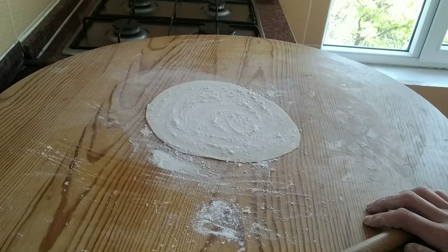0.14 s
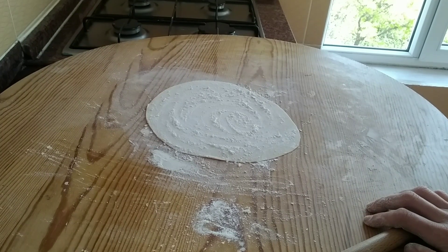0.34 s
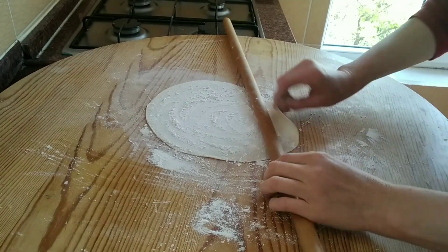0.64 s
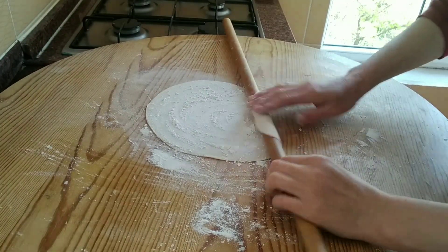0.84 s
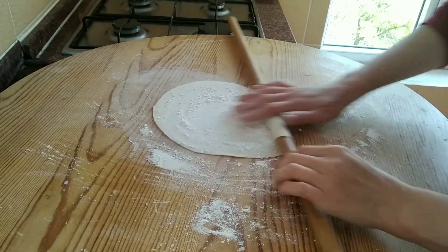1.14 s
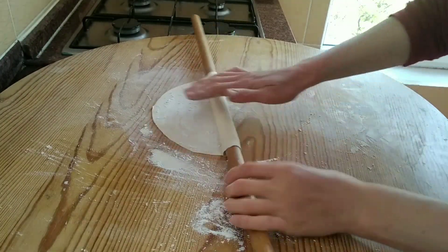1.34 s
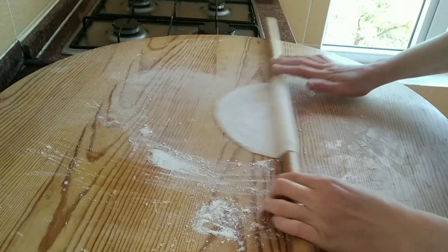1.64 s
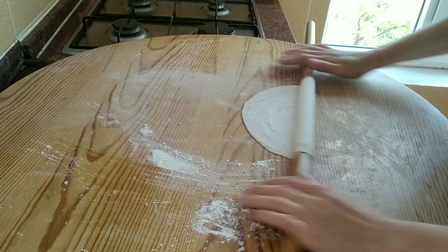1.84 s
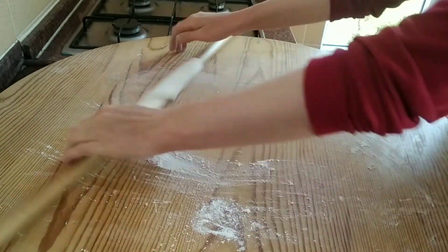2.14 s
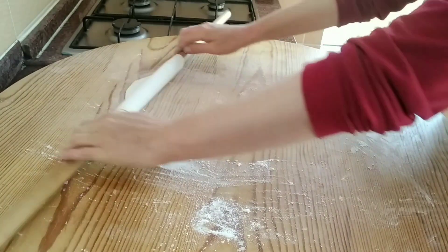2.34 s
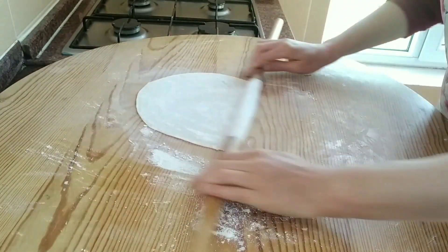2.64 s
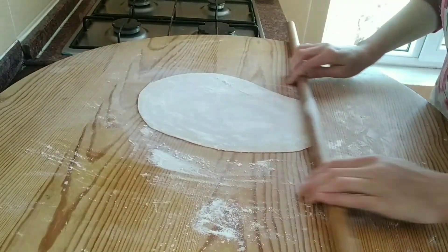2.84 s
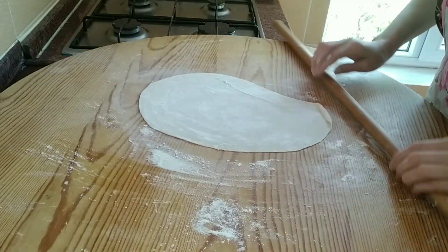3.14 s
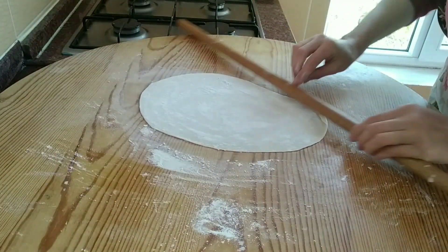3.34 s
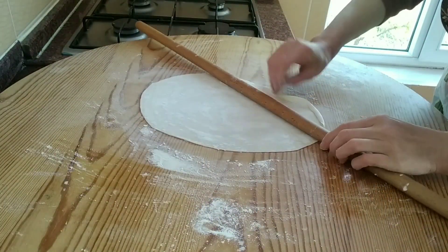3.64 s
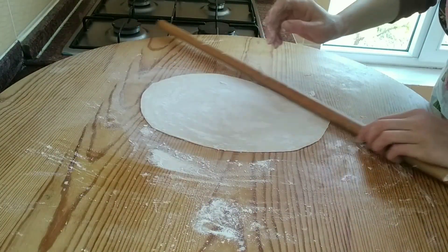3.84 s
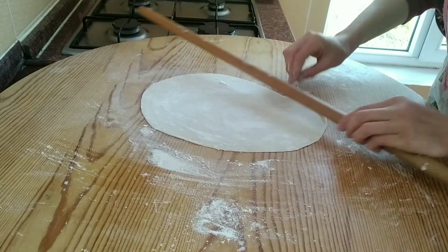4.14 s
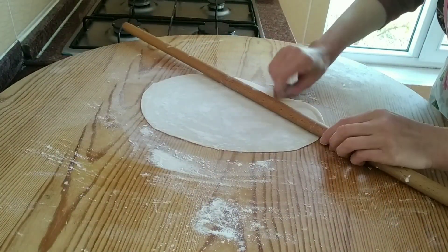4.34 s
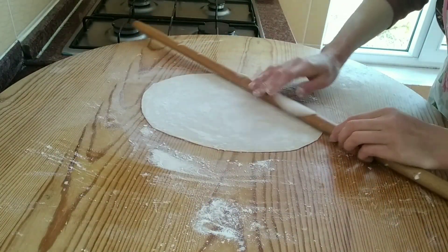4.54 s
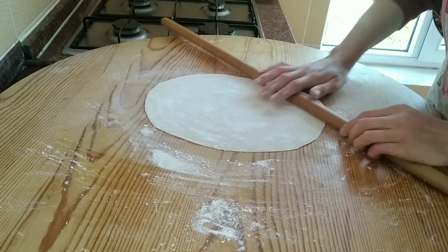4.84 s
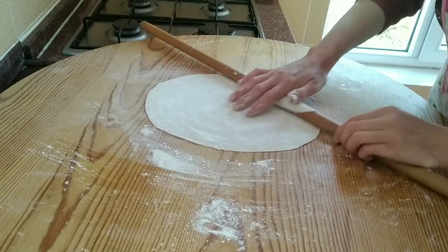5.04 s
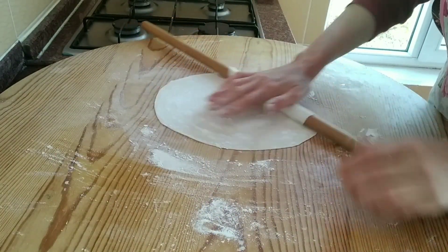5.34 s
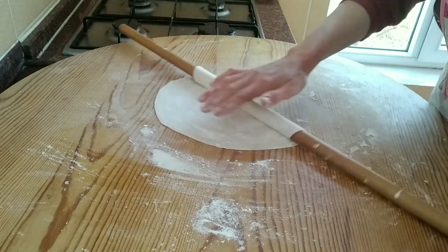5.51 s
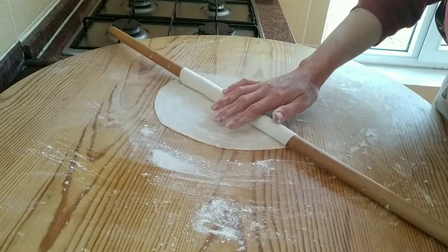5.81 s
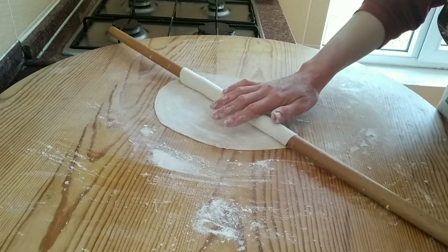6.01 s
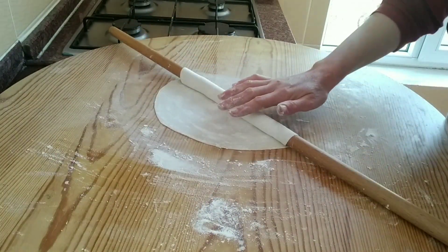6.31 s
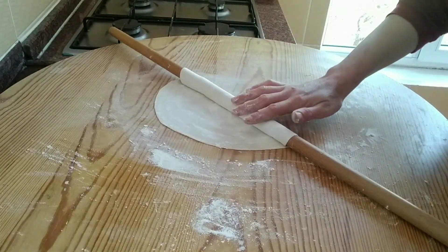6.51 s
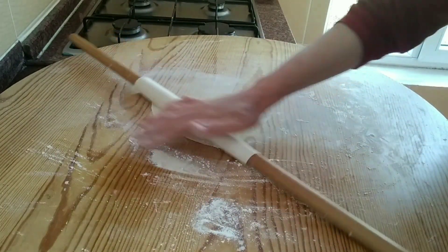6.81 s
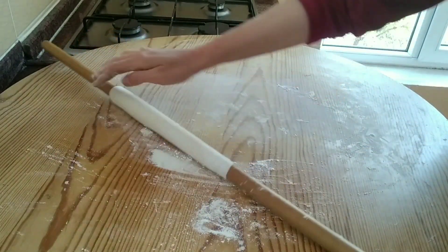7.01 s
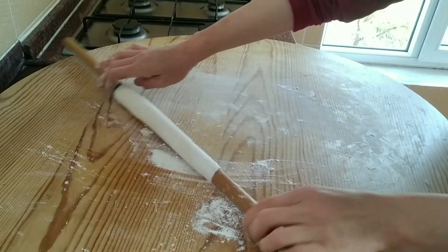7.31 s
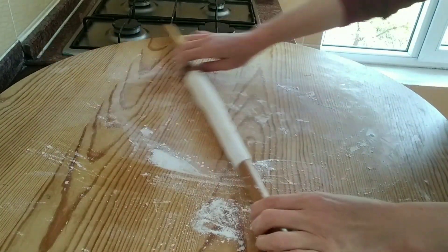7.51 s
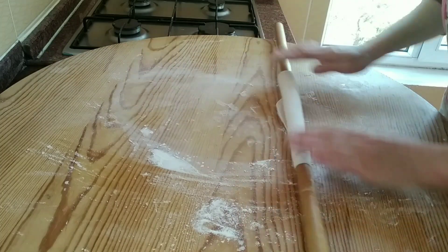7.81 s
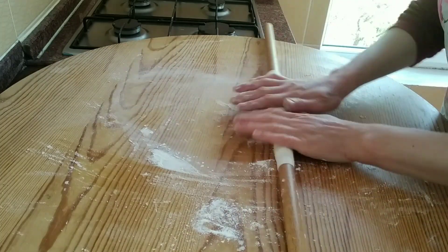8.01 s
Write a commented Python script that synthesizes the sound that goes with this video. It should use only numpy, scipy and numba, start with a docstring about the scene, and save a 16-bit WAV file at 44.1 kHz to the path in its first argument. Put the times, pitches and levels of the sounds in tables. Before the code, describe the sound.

Close stereo sound in a small tiled kitchen, with quiet room air and a low wavering mains hum; a faint whirr stops just before 0.5 s. The wooden pin then touches down with dull light knocks and a short trundle. Firmer hollow knocks at 1.2 and 1.35 s lead to a rapid run of clacks from 1.8 to 2.2 s, then a long floury swish. A double knock at 2.8 s is followed by rolling and small rattles from 3.05 to 3.4 s and a thud at 3.6. The hardest knock bangs at 4.26 s, the board booming. Soft drags and dull palm pats fill 4.4 to 5.4 s, then it is quieter. Two sharp, cracking wooden knocks strike at 6.4 and 6.6 s. A broad dry swish starts at 7.2 s, a knock lands at 7.67, and a soft pat and rub close at 7.9.

```python
"""Rolling out dough on a wooden board

A long thin wooden rolling pin winds up a sheet of dough on a big floured board in a small kitchen.
Each knock is a damped thud of the board, ringing modes of board and pin, and a crack of bare wood.
Shaped noise makes the trundling pin, the swish of dough and palms over flour, and the soft pats.
Wavering sines make a mains hum beneath, with room air and a faint whirr that stops early on.
A gain control ducks on the hardest knocks, so the room swells up behind them."""
import sys
import numpy as np
from scipy import signal
from scipy.fft import rfft, irfft, next_fast_len
from scipy.io import wavfile
from scipy.ndimage import uniform_filter1d, map_coordinates
from numba import njit

SR = 44100
rng = np.random.default_rng(int(sys.argv[2]) if len(sys.argv) > 2 else 0)


def output_pcm(signal):
    """Save a mono or channel-first signal as 16-bit PCM at the path in sys.argv[1].

    Samples are clipped to [-1, 1] before scaling.
    """
    pcm = np.clip(np.atleast_2d(signal).T, -1, 1) * 32767
    wavfile.write(sys.argv[1], SR, np.round(pcm).astype(np.int16))


N = 359856  # length in samples


def amp(db):
    """Decibels to gain."""
    return 10 ** (np.asarray(db) / 20)


def unit(x):
    """Scale to rms 1."""
    return x / np.sqrt(np.mean(x ** 2) + 1e-20)


def along(points, hz):
    """Read a curve of (Hz, value) points on a log frequency axis."""
    point_hz, values = np.transpose(points)
    return np.interp(np.log(hz + 1), np.log(point_hz + 1), values)


def wobble(rate):
    """A smooth random curve with the given number of knots a second."""
    knots = rng.standard_normal(int(N * rate / SR) + 4)
    return map_coordinates(knots, [np.arange(N) * rate / SR])


def filtered(x, gain):
    """Multiply the spectrum of x by a gain that depends on frequency."""
    n = x.shape[-1]
    padded = next_fast_len(n + 8192)
    spectrum = rfft(x, padded) * gain(np.fft.rfftfreq(padded, 1 / SR))
    return irfft(spectrum, padded)[..., :n]


def coloured(x, spectrum, size=2048):
    """Colour x by (Hz, dB) points with a minimum-phase filter of energy 1, so attacks stay sharp."""
    cepstrum = irfft(np.log(amp(along(spectrum, np.fft.rfftfreq(size, 1 / SR)))))
    # folding the cepstrum forward makes the filter causal
    cepstrum[1:size // 2] *= 2
    cepstrum[size // 2 + 1:] = 0
    kernel = irfft(np.exp(rfft(cepstrum)))
    kernel /= np.linalg.norm(kernel)
    return signal.fftconvolve(x, kernel[None], axes=1)[:, :x.shape[1]]


# Stereo width of diffuse sound. Each row: frequency in Hz, left-right likeness from 0 to 1.
LIKENESS = [(100, 0.95), (300, 0.86), (600, 0.64), (1200, 0.054), (4000, 0.015)]


def diffuse(pair):
    """Blend two unrelated signals into left and right that are alike in the bass and wide in the treble."""
    def mid_and_side_gain(hz):
        angle = np.arccos(np.clip(along(LIKENESS, hz), -1, 1)) / 2
        return np.array([np.cos(angle), np.sin(angle)])

    mid, side = filtered(pair, mid_and_side_gain)
    return np.array([mid + side, mid - side])


def rush(spectrum, spiky=0):
    """Coloured stereo noise of rms 1; spiky gives its tiny impacts log-normal sizes."""
    impacts = rng.standard_normal((2, N)) * np.exp(spiky * rng.standard_normal(N))
    return unit(diffuse(filtered(impacts, lambda hz: amp(along(spectrum, hz)))))


def add(track, s, sound):
    """Mix a stereo sound into the track at time s."""
    part = track[:, round(s * SR):][:, :sound.shape[1]]
    part += sound[:, :part.shape[1]]


def gestures(table, curve=1.5):
    """Gain of movements that speed up and slow down on a quarter sine; loudness is a power of speed."""
    t = np.arange(N) / SR
    power = np.zeros(N)
    for s, rise, fall, db in table:
        speed = np.sin(np.pi / 2 * np.interp(t, [s, s + rise, s + rise + fall], [0, 1, 0]))
        power += (amp(db) * speed ** curve) ** 2
    return np.sqrt(power)


# Reverb of the tiled room. Each row: frequency in Hz, time to fall 60 dB in seconds.
KITCHEN = [(100, 0.92), (300, 0.58), (900, 0.5), (2500, 0.42), (6000, 0.36), (14000, 0.3)]


def kitchen(x, build_s=0.0007):
    """The tiled room's answer: noise that builds up in a few ms and dies fastest in the treble."""
    hz, t, noise = signal.stft(rng.standard_normal((2, SR * 3 // 4)), SR, nperseg=256)
    decay = amp(-60 * t / along(KITCHEN, hz)[:, None])
    tail = diffuse(signal.istft(noise * decay, SR, nperseg=256)[1])
    tail *= 1 - np.exp(-np.arange(tail.shape[1]) / SR / build_s)
    return signal.fftconvolve(x, tail / np.linalg.norm(tail[0]), axes=1)


# Mains hum. Each row: frequency in Hz, middle rms level in dB.
HUM = [(49.5, -64), (100, -54.5), (259, -65.5), (592, -67), (700, -82)]
# Colour of the room air. Each row: frequency in Hz, relative density in dB per Hz.
AIR = [(15, -37), (25, -14.5), (55, -18), (73, -26), (107, 3.5), (282, -8.5), (332, -5), (411, -24),
       (600, -33.5), (686, -13.5), (2310, -27.5), (2640, -20), (15600, -27)]
# Colour of the faint whirr. Each row: frequency in Hz, relative density in dB per Hz.
WHIRR = [(150, 10), (300, -7), (550, 1), (760, 12.5), (1100, -9), (2200, -17), (2900, -3), (4000, -47),
         (14000, -32)]


def background(air_db=-57, whirr_db=-55.5, waver_db=2):
    """Room air as noise, mains hum as slightly wavering sines, and a faint whirr that stops early on."""
    t = np.arange(N) / SR
    hum = np.zeros(N)
    for hz, db in HUM:
        level = np.sqrt(2) * amp(db + waver_db * wobble(3.31))
        hum += level * np.sin(2 * np.pi * hz * t + 0.091 * wobble(6.2))
    whirr = amp(whirr_db) * (t < DIP[0]) * rush(WHIRR)
    return hum + amp(air_db) * rush(AIR) + whirr


# Arms leaning on the board. Each row: start in seconds, loading in seconds, easing in seconds,
# level in dB before the shared trim.
LEANS = [ (0.5, 0.1, .18, -49), (1.05, .32, .18, -45), (1.68, 0.44, 0.24, -41), (2.85, .22, .38, -49),
         (3.58, 0.072, 0.085, -49), (4.24, 0.079, 0.16, -41), (5.54, 0.057, 0.11, -51),
         (6.4, 0.1, 0.28, -47), (7.17, 0.18, 0.28, -40), (7.6, 0.076, 0.3, -57)]
# Colour of the rocking. Each row: frequency in Hz, relative density in dB per Hz.
ROCKING = [(15, 14), (30, 1.5), (55, 22), (75, -4), (130, 2.5), (250, -42), (600, -100)]


def rocking(rock_db=-2, rest_db=-55):
    """The whole board rocks under the weight of the arms as low noise, and never quite rests."""
    return amp(rock_db) * (gestures(LEANS, curve=1.0) + amp(rest_db)) * rush(ROCKING)


# Lowest modes of the table. Each row: frequency in Hz, relative density in dB per Hz.
BOOM = [(40, -32), (66, -10), (85, -9), (100, 7), (125, -9), (190, -7.5), (300, -42.5)]


def booming(boom_db=-38, follows=0.46, attack_s=0.014, t60=1.0):
    """Even a light knock sets the whole table booming; harder ones add only a little."""
    t = np.arange(N) / SR
    coarse_t = t[::64]
    power = np.zeros(len(coarse_t))
    for s, db, *_ in KNOCKS:
        age = np.maximum(coarse_t - s, 0)
        swell = (1 - np.exp(-age / attack_s)) * amp(-60 * age / t60)
        power += (amp(follows * db) * swell) ** 2
    return amp(boom_db) * np.interp(t, coarse_t, np.sqrt(power)) * rush(BOOM)


# Crumbs of dry dough. Each row: time in seconds, level in dB before the shared trim.
TICKS = [(0.37, -34), (1.2114, -45), (5.187, -41.5), (6.8967, -41)]


def crumbs(tick_db=-6, t60=0.057):
    """Dry crumbs snap with a tiny high tick: a short decaying burst of bright noise."""
    track, t = np.zeros((2, N)), np.arange(SR // 10) / SR
    colour = [(1000, -8.5), (6000, -24.0), (9500, -3.0), (12500, -17.0), (15500, -11.5)]  # (Hz, dB)
    for s, db in TICKS:
        snap = rng.standard_normal((2, len(t))) * amp(db + tick_db - 60 * t / t60)
        add(track, s, coloured(snap, colour))
    return track


# Palm and dough landing on the board. Each row: time in seconds, peak in dB before the shared trim.
PATS = [(4.871, -35), (4.895, -39.5), (4.953, -35.5), (5.142, -25.5), (5.165, -38), (5.277, -26.5),
        (5.352, -34.5), (5.386, -34), (7.943, -29.5)]
# Colour of a pat. Each row: frequency in Hz, relative density in dB per Hz.
PAT = [(50, 1.5), (120, -2), (200, 1.5), (330, 2.5), (520, -1), (760, -4), (1000, -19), (2000, -38),
       (6000, -43)]


def pats(pat_db=-1, t60=0.076):
    """Palm and dough land softly: a short dull push of noise into the board, answered by the room."""
    track, t = np.zeros((2, N)), np.arange(SR // 8) / SR
    for s, db in PATS:
        burst = diffuse(rng.standard_normal((2, len(t)))) * amp(-60 * t / t60)
        thump = coloured(burst, PAT)
        thump *= amp(db + pat_db) / np.abs(thump).max()
        add(track, s, thump)
        add(track, s, kitchen(thump))
    return track


def scrape(spectrum, patchy_db=2.9, grit_db=-8, grit_per_s=500):
    """Friction of rms about 1: a hiss whose colour shifts with the contact, and grains that catch."""
    bins = signal.stft(rush(spectrum, spiky=0.067), nperseg=512)[2]
    patches = uniform_filter1d(rng.standard_normal(bins.shape[1:]), size=4, axis=0)
    patches = unit(uniform_filter1d(patches, size=10, axis=1))
    hiss = unit(signal.istft(bins * amp(patchy_db * patches), nperseg=512)[1][:, :N])
    grains = rng.standard_normal((2, N)) * (rng.random(N) < grit_per_s / SR)
    return hiss + amp(grit_db) * unit(coloured(grains, spectrum))


# Dough or a palm sweeping over flour. Each row: start in seconds, speeding up in seconds,
# slowing down in seconds, level in dB before trims, coarse drag against fine hiss in dB before trims.
SWEEPS = [ (0.521, 0.092, 0.53, -60, 2), (0.78, 0.19, 0.069, -49, 3), (1.02, 0.02, 0.24, -54.5, -3),
          (1.18, 0.19, 0.067, -52.5, 3), (1.39, 0.2, 0.38, -44, -1), (1.791, 0.081, 0.017, -32.5, -2),
          (1.74, 0.15, 0.14, -49, 3), (2.269, 0.28, 0.48, -36, -6.5), (2.62, 0.32, 0.25, -43, -0.5),
          (3.15, 0.026, 0.083, -52, 4), (3.3, 0.15, 0.24, -55, 4), (3.59, 0.19, 0.19, -43.5, 1),
          (3.9, 0.15, 0.11, -65.5, -1), (4.2, 0.088, 0.42, -54, 3), (4.42, 0.19, 0.15, -45, -1.5),
          (4.72, 0.052, 0.22, -52.5, -4.5), (4.87, 0.09, 0.056, -50, 3), (4.97, .12, 0.13, -45, 0),
          (5.12, 0.096, 0.3, -60.5, -3), (5.49, 0.037, 0.1, -54.5, 4), (5.549, 0.16, 1.0, -58.5, -1),
          (5.77, 0.078, 0.067, -51, -14), (5.9, 0.023, 0.051, -53, -3.5), (6.87, 0.09, 0.11, -59, -6),
          (7.211, 0.008, 0.11, -45, -7), (7.2, 0.37, 0.19, -41.5, 1), (7.881, 0.068, 0.3, -50, -5)]
# Fine hiss of the powder. Each row: frequency in Hz, relative density in dB per Hz.
FLOUR = [(1500, -38), (4000, -12.5), (6000, -9), (8000, -0.5), (9800, -0.5), (12500, -8), (15600, -10)]
# Dough dragging on the wood. Each row: frequency in Hz, relative density in dB per Hz.
DRAG = [(300, -7), (800, -6.5), (1400, -4.5), (2500, -4), (4000, -4.5), (6000, -5), (9000, -16),
        (15600, -43)]


def sliding(hiss_db=0.74, drag_db=-3.0, flutter_db=0.76, curve=1.39):
    """Dough and skin glide on flour with a fine hiss, and drag more coarsely where the flour is thin."""
    fine = gestures([row[:-1] for row in SWEEPS], curve)
    coarse = gestures([(*timing, db + coarse_db) for *timing, db, coarse_db in SWEEPS], curve)
    hiss = amp(hiss_db) * fine * scrape(FLOUR)
    drag = amp(drag_db) * coarse * scrape(DRAG)
    return amp(flutter_db * wobble(45)) * (hiss + drag)


# The pin is pushed, gathers speed and runs out. Each row: start in seconds, speeding up in seconds,
# slowing down in seconds, level in dB before the shared trim.
ROLLS = [ (0.474, 0.0096, 0.38, -41), (0.96, 0.0051, 0.03, -39), (1.03, 0.036, 0.11, -47),
         (1.46, 0.2, 0.059, -47), (2.5, 0.14, 0.037, -44.5), (3.05, 0.093, 0.085, -32),
         (3.255, 0.016, 0.29, -33), (3.7, 0.064, 0.29, -46), (4.55, 0.038, 0.18, -48.5),
         (4.8, 0.055, 0.27, -50), (5.22, 0.03, 0.29, -53.5), (5.555, 0.0072, 0.054, -48.5),
         (7.2, 0.025, 0.067, -43.5), (7.35, 0.0071, 0.018, -40.5), (7.93, 0.011, 0.23, -44.5)]
# Colour of the trundle. Each row: frequency in Hz, relative density in dB per Hz.
TRUNDLE = [(50, -15), (100, -22), (150, -6), (200, -1), (290, 1), (400, -0.5), (550, -6.5), (720, -3.5),
           (1000, -15.5), (1500, -17), (3500, -21), (7000, -38)]


def rolling(roll_db=-2, bump_db=2, room_db=-2, creep_db=-62):
    """The pin trundles over grain and lumps as spiky, uneven noise; between pushes it barely creeps."""
    push = gestures(ROLLS, curve=1.92) + amp(creep_db)
    surface = unit(amp(bump_db * wobble(35)) * rush(TRUNDLE, spiky=0.67))
    bumps = amp(roll_db) * push * surface
    return bumps + amp(room_db) * kitchen(bumps)[:, :N]


def modes(table, t, scatter_db=2.0, side_turn=1.0):
    """Decaying modes; each spot struck favours others, and each radiates differently to left and right."""
    hz, db, t60 = np.transpose(table)[:, :, None]
    strength = amp(db + scatter_db * rng.standard_normal(hz.shape) - 60 * t / t60)
    # side_turn: spread of the phase in radians per kHz
    phase = side_turn * hz / 1000 * rng.standard_normal((2, len(hz), 1))
    detune = 1 + 0.0056 * rng.standard_normal(hz.shape)  # the hands load the wood differently each time
    return (strength * np.sin(2 * np.pi * hz * detune * t + phase)).sum(1)


def chatter(rebound, rebound_s=0.0026, graze=0.56, count=5):
    """Contacts a few ms apart, of total energy 1; a pin landing aslant grazes first, then rebounds longer."""
    delays = np.r_[0, np.cumsum(rebound_s * rng.uniform(0.3, 1.7, count))]
    sizes = np.clip(rebound, 0, 1) ** np.arange(count + 1)
    sizes[0] -= graze * sizes[2]
    return np.bincount(np.round(delays * SR).astype(int), sizes / np.linalg.norm(sizes))[None]


def scattering(straight, straight_hz, t60):
    """Part of the wave arrives straight; the rest, and most treble, bounces about in the board first."""
    t = np.arange(SR // 12) / SR
    share = np.clip(straight, 0, 1)
    waves = diffuse(rng.standard_normal((2, len(t)))) * amp(-60 * t / t60)
    lowpass = signal.butter(1, min(straight_hz, SR / 3), fs=SR)
    front = signal.lfilter(*lowpass, 1. * (t == 0))
    return np.sqrt(share) * front + np.sqrt(1 - share) * waves / np.linalg.norm(waves[0])


# Snap of bare wood. Each row: frequency in Hz, relative density in dB per Hz.
CRACK = [(1200, -33), (2300, -12.5), (3200, -12.5), (4250, 3.5), (5000, -1), (5800, -1), (7700, -1.5),
         (10000, -4), (13000, -12.5), (16000, -40)]
# Upper modes of the pin, rung only by bare wood on wood.
# Each row: frequency in Hz, relative level in dB, time to fall 60 dB in seconds.
PIN_TOP = [(4140, -6, 0.036), (4350, -2, 0.04), (5460, 3, 0.042), (6060, -15, 0.09), (7060, 1, 0.079),
           (7570, 2, 0.07), (7820, 0.5, 0.05), (8740, 2.5, 0.061)]


def crack(push, t, snap_db=13.5, top_db=-22, mirror_s=0.000506, mirror=0.24):
    """Bare wood snaps and rings; its mirror image in the board arrives just behind and combs the treble."""
    snap = amp(snap_db) * coloured(push, CRACK) + amp(top_db) * modes(PIN_TOP, t)
    return filtered(snap, lambda hz: 1 + mirror * np.exp(-2j * np.pi * hz * mirror_s))


# Dense, quickly damped modes of the board. Each row: frequency in Hz, relative density in dB per Hz.
THUD = [(60, -15), (150, -2.5), (280, 6.5), (450, 1.5), (800, 2), (1500, -2), (2500, -4), (3500, -8.5),
        (8000, -46), (16000, -82)]
# Ringing modes of the board. Each row: frequency in Hz, relative level in dB,
# time to fall 60 dB in seconds.
BOARD = [(266.9, -12, 0.39), (338, -13.5, 0.38), (384.8, -9, 0.16), (482.7, -11.5, 0.22), (689.6, -9, 0.22),
         (860, -9, 0.23), (1155, 2, 0.044), (1483, 0, 0.045), (1800, -10, 0.02)]
# Bending modes of the pin. Each row: frequency in Hz, relative level in dB,
# time to fall 60 dB in seconds.
PIN = [(790, -5, .06), (905, 0, .09), (1040, 0, .09), (1190, -4, .05), (1320, -5, .025), (1530, -8, .025)]


def knock(lower_hz, upper_hz, spot_db, bright_hz, low_hz, crack_db, pin_db,
          board_db=-15.5, push_db=17.5, spot_cycles=65):
    """One contact as three sounds: thud of the board, ring of board and pin, crack of wood on wood."""
    t = np.arange(SR // 2) / SR
    push = np.array([t == 0, t == 0], float)
    ring = amp(board_db) * (modes(BOARD, t) + amp(pin_db) * modes(PIN, t))
    # the spot's own two modes fall 60 dB in spot_cycles periods
    spot_modes = [(hz, 0, spot_cycles / hz) for hz in (lower_hz, upper_hz)]
    ring += amp(spot_db - 4.5) * modes(spot_modes, t)
    # a softer contact leaves out the upper modes, a stiffer spot the lower ones
    contact = signal.butter(2, min(bright_hz, SR / 3), fs=SR)
    spot = signal.butter(1, low_hz, "highpass", fs=SR)
    thud = signal.lfilter(*contact, amp(push_db) * coloured(push, THUD))
    thud = signal.lfilter(*spot, thud)
    return thud, signal.lfilter(*contact, ring), amp(crack_db) * crack(push, t)


# Pin on board. Each row: time in seconds, blow in dB, lower and upper ring at that spot in Hz,
# their level in dB before a trim, contact brightness (lowpass) in Hz, low end of the thud (highpass)
# in Hz, crack in dB against the blow, ring of the pin in dB against that of the board,
# rebound share from 0 to 1.
KNOCKS = [ (0.488, -21.5, 606, 740, -10.5, 1070, 130, -26, 0, 0.87),
          (0.602, -25, 780, 1140, -7, 1520, 150, -10.5, 5, 0.9),
          (0.859, -25, 275.7, 770, -8.5, 706, 130, -40, 2, 0.68),
          (1.187, -14.5, 278, 682, -13.5, 1590, 220, -50, -12, 1),
          (1.35, -15.5, 775, 1214, -9.5, 1900, 282, -27, -23, 0.83),
          (1.62, -34.5, 780, 1300, -17, 2260, 200, -22, 2, 0.59),
          (1.815, -17.5, 760, 1100, -11, 1680, 350, -44, -14, 1),
          (1.882, -16.5, 197, 773, -9, 1050, 100, -10, -24, 0.2),
          (1.978, -12, 676, 1220, -11, 2030, 200, -21, -8, 0.99),
          (2.036, -11, 1297, 1455, -3.5, 2670, 753, -3, 1, 0.43),
          (2.130, -8.5, 895, 1407, -9, 2600, 517, -16, -20, 1),
          (2.194, -15.5, 860, 1140, -25, 1480, 149, -8, -20, 0.53),
          (2.646, -27, 686, 1400, -3.5, 1900, 400, -24, -8, 0.89),
          (2.804, -20.5, 864, 1150, -22, 1516, 400, -26, -18, 0.66),
          (2.813, -10.5, 670, 903, -14.5, 1140, 298, -19.5, -9, 0.73),
          (3.082, -21.5, 680, 1140, -6, 795, 250, -19, -9, 0.78),
          (3.133, -24.5, 454, 677, -2.5, 775, 200, -24, -9, 0.53),
          (3.158, -28, 475, 1170, -2, 890, 193, -10, -16, 0),
          (3.187, -27.5, 3000, 3940, -13, 2600, 300, -5, -20, 0.7),
          (3.203, -37, 490, 3080, -10, 2400, 300, -15, -17, 0.22),
          (3.262, -19.5, 773, 4200, 0, 950, 220, -17, -6, 0.77),
          (3.278, -16, 2960, 4050, 10, 1010, 300, -17.5, 1.5, 0.74),
          (3.303, -22.5, 678, 3700, 0.5, 845, 300, -15, -2, 0.49),
          (3.341, -27.5, 690, 2900, -16, 900, 400, -11, 7, 0.3),
          (3.381, -27.5, 464, 1160, -10, 900, 400, -12, 3, 0.64),
          (3.589, -11, 715, 870, -14, 1070, 173, -25, -33, 1),
          (4.264, 2, 860, 1395, -12.5, 2310, 950, -23, -19, 0.59),
          (5.564, -36, 663, 915, -21, 950, 152, -12, -13, 0.97),
          (5.928, -36, 920, 1080, -12, 860, 252, -12, 3, 1),
          (6.4056, -2.5, 803, 1650, -12, 1540, 237, 0, 2, 0.69),
          (6.585, -5.5, 958, 1066, -1, 1770, 423, -2.5, -3.5, 0.58),
          (7.671, -11, 764, 1160, -13.5, 1330, 220, -23, -11, 0.95)]


def knocks(thud_db=2.0, ring_db=2.5, ring_room_db=-1.0):
    """The pin chatters before it settles while the wood rings cleanly; the room adds a smooth tail."""
    track = np.zeros((2, N))
    for s, db, *contact, rebound in KNOCKS:
        thud, ring, click = amp(db) * np.array(knock(*contact))
        thud_path = scattering(straight=0.37, straight_hz=3500, t60=0.019)
        click_path = scattering(straight=0.21, straight_hz=10730, t60=0.016)
        direct = amp(thud_db) * signal.fftconvolve(thud, thud_path, axes=1)
        direct += signal.fftconvolve(click, click_path, axes=1)
        add(track, s, signal.fftconvolve(direct, chatter(rebound), axes=1))
        add(track, s, amp(ring_db) * ring)
        add(track, s, kitchen(thud + click + amp(ring_room_db) * ring))
    return track


def scene(right_db=0.84):
    """All layers; everything but the sweeps and crumbs leans a little to the right."""
    wood = background() + rocking() + booming() + pats() + rolling() + knocks()
    return wood * amp([[-right_db], [right_db]]) + crumbs() + sliding()


@njit
def follower(excess, attack, release):
    """Follow a level quickly upward and slowly downward."""
    out, held = np.zeros(len(excess)), 0.0
    for i in range(len(excess)):
        held += (excess[i] - held) * (attack if excess[i] > held else release)
        out[i] = held
    return out


# The level dips briefly. In order: start in seconds, end in seconds.
DIP = (0.448, 0.467)


def record(dry, threshold_db=-13, attack_s=0.0028, release_s=0.037, ceiling=0.89, top_hz=15700):
    """Gain control ducks on loud peaks, crests are rounded off, the level dips once, the top is cut."""
    t = np.arange(N) / SR
    level_db = 20 * np.log10(np.abs(dry).max(0) + 1e-9)
    excess_db = np.maximum(level_db - threshold_db, 0)
    x = dry * amp(-follower(excess_db, 1 / (attack_s * SR), 1 / (release_s * SR)))
    x = x / (1 + (x / ceiling) ** 4) ** (1 / 4)
    x = x * amp(-18 * ((t > DIP[0]) & (t < DIP[1])))
    return filtered(x, lambda hz: hz < top_hz)


dry = scene()
out = record(dry)
output_pcm(out)
```